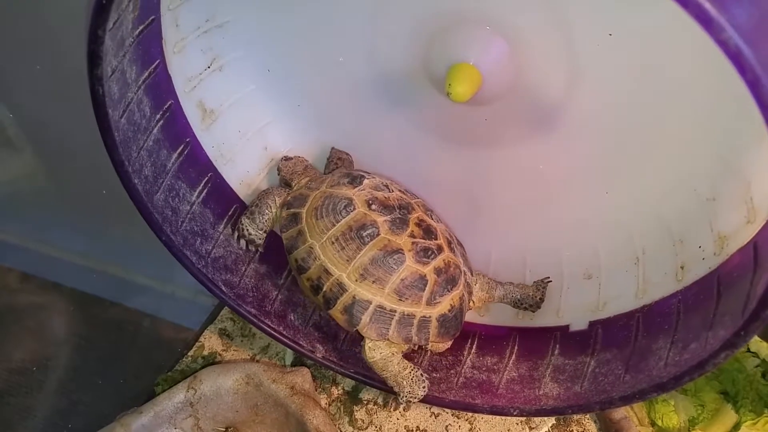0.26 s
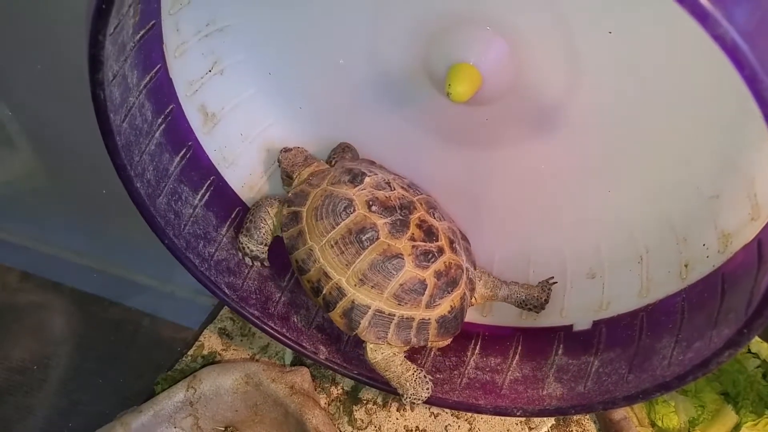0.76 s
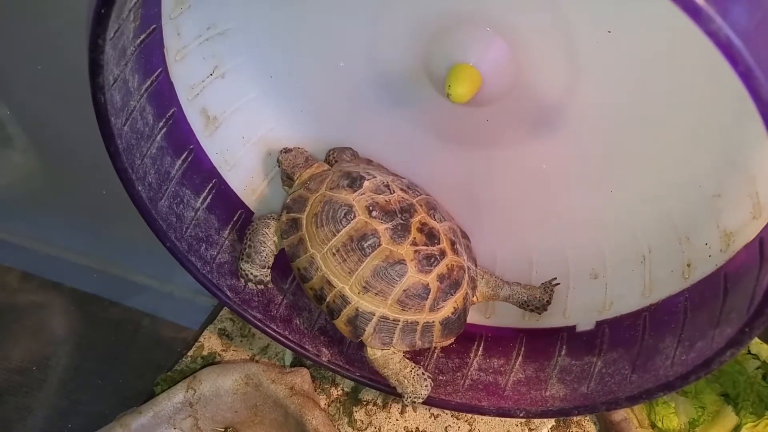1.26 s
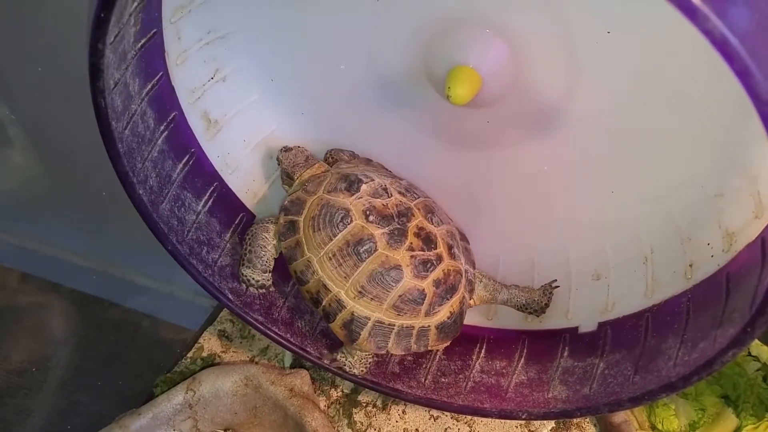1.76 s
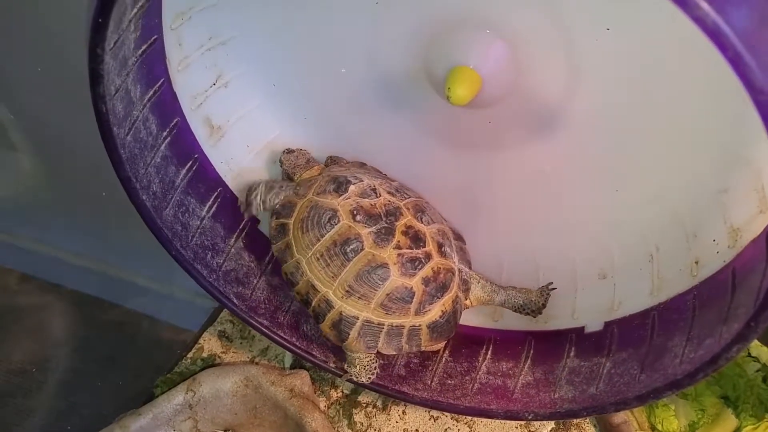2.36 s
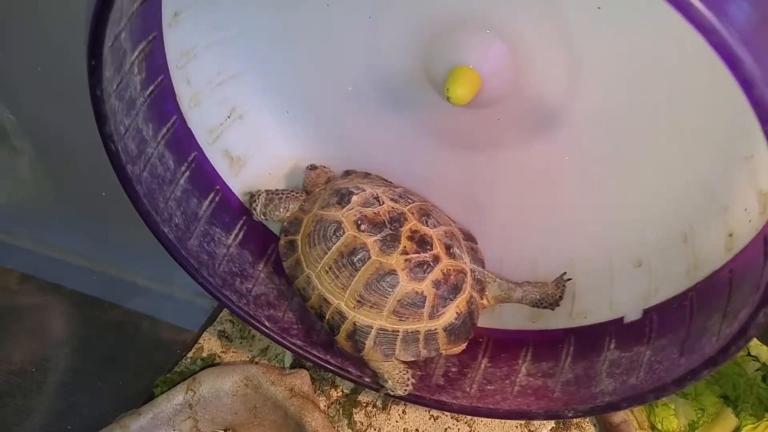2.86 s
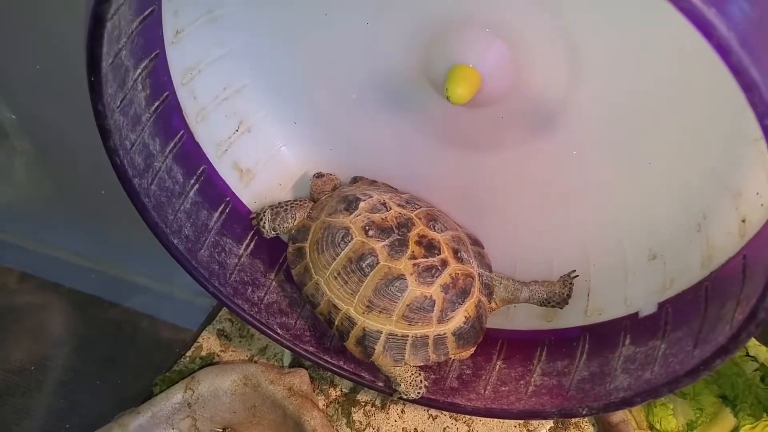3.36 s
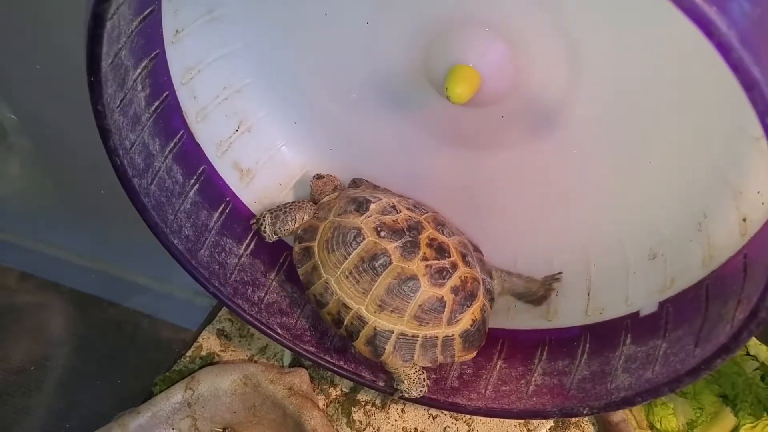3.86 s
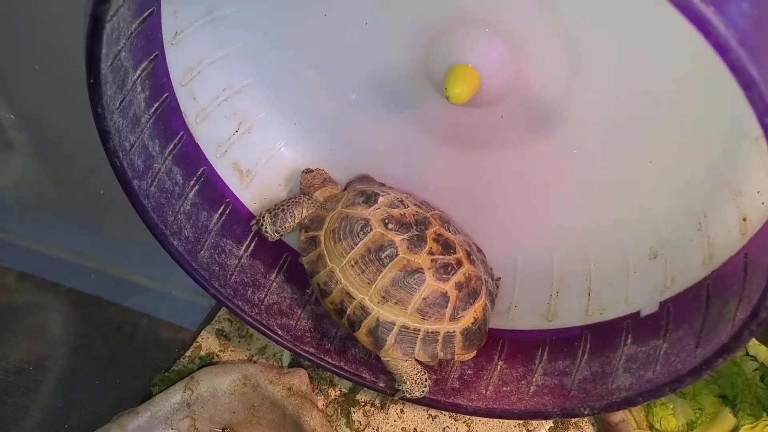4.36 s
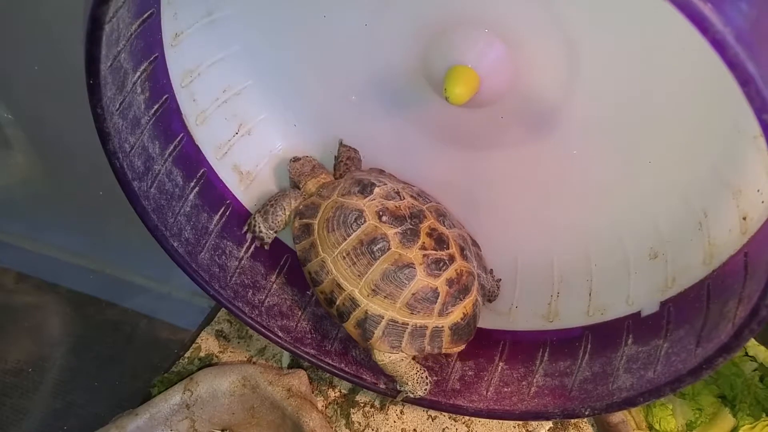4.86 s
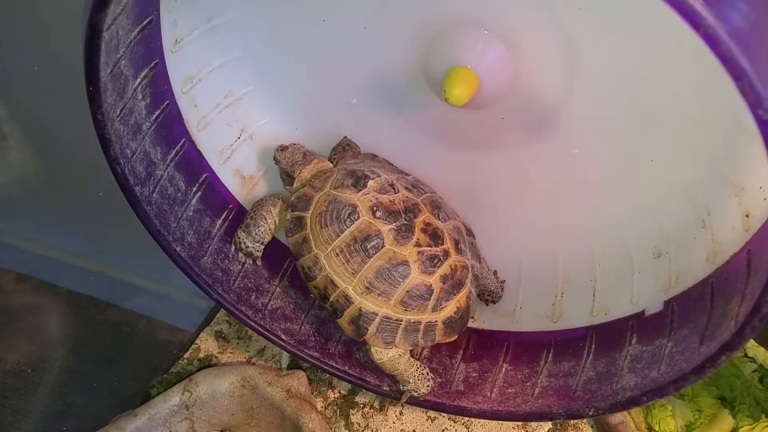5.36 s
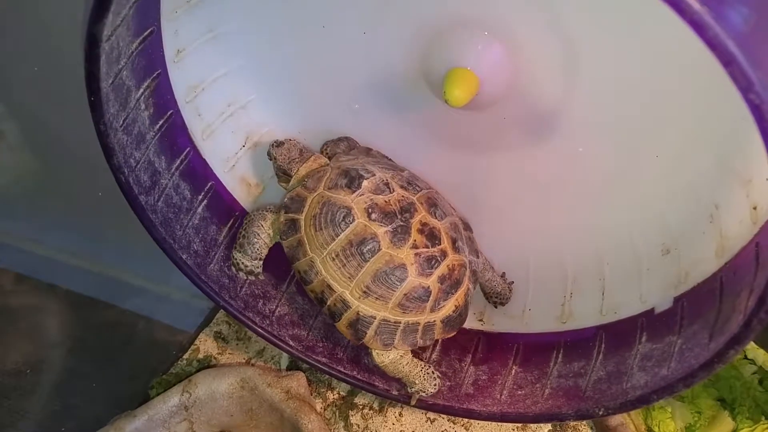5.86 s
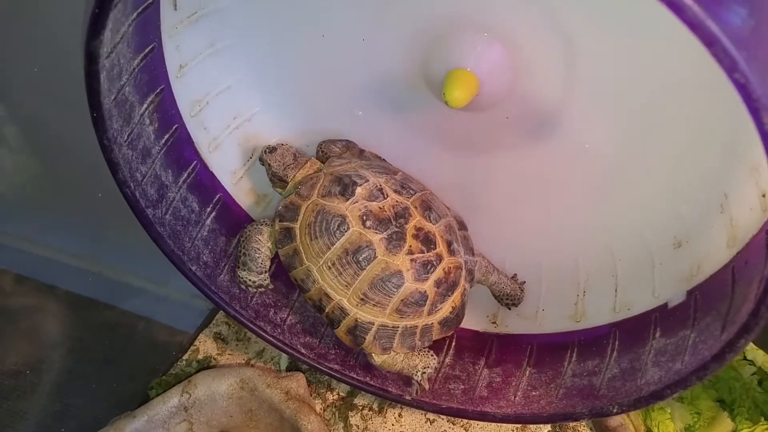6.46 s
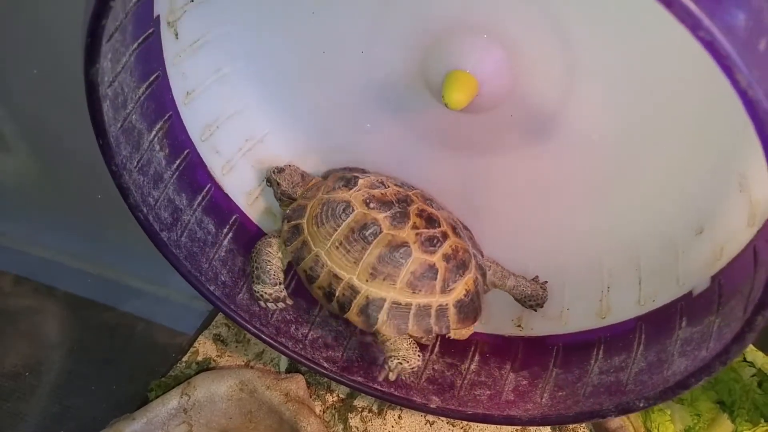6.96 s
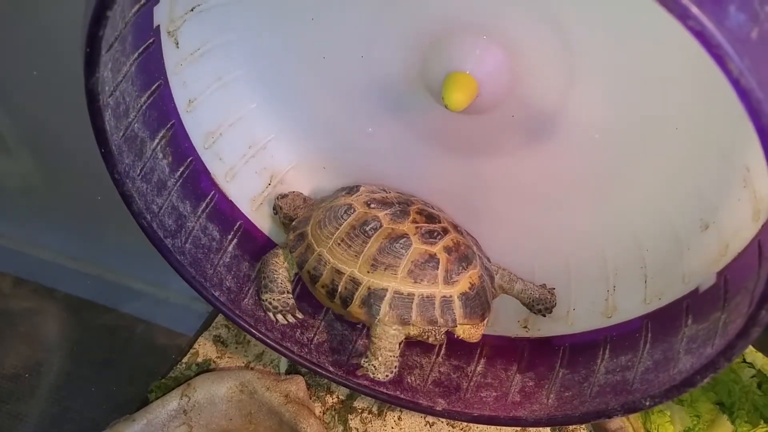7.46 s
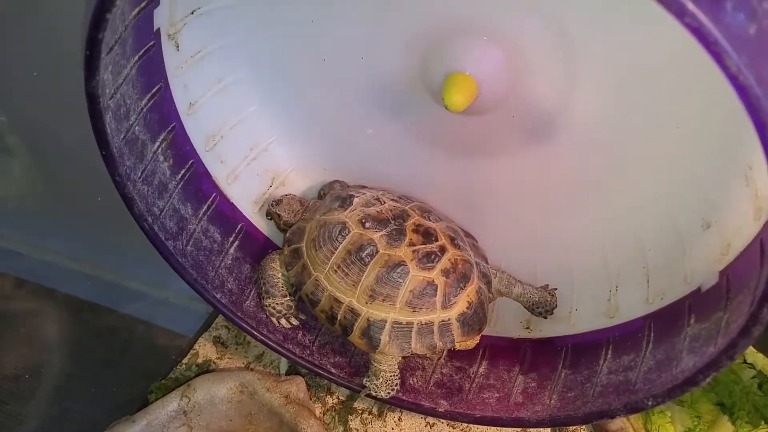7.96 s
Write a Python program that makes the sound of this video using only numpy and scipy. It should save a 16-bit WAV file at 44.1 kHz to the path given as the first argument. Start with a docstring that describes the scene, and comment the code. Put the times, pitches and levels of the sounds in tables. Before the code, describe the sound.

A tortoise walks in a plastic exercise wheel, heard close up. Its claws click sharply and its shell knocks on the ribbed plastic, with a gritty hiss of dragging feet in between. The uneven taps thin out, then a longer scrape leads into the loudest cluster of hollow knocks. Lighter ticks and scratches follow. A faint room hum lies behind it all.

```python
"""Sharp claw knocks come first, over a gritty hiss: a tortoise is walking in a plastic exercise wheel.
Claws and shell strike the ribbed rim and ring the wheel's modes; dragging feet make the hiss.
A microphone pair stands close by, the right one nearer the wheel, with enclosure walls just around it.
Far behind lie the faint hum and hiss of the room."""
import sys
import numpy as np
from scipy import signal
from scipy.fft import rfft, irfft
from scipy.io import wavfile
from scipy.ndimage import uniform_filter1d

SR = 44100
rng = np.random.default_rng(int(sys.argv[2]) if len(sys.argv) > 2 else 0)


def master_out(mix):
    """Clip the mix to full scale and print it as 16-bit PCM to the path in sys.argv[1]."""
    frames = np.transpose(np.atleast_2d(mix))
    ceiling = np.clip(frames, -1, 1)
    pcm = np.round(ceiling * 32767).astype(np.int16)
    wavfile.write(sys.argv[1], SR, pcm)


N = 362502

# blows on the wheel: (time [s], claw crack [dB], shell thump [dB], disc tock [dB], chatter t60 [s])
KNOCKS = [(0.0412, -10, -29.5, -14.5, 0.023), (0.1021, -43, -43.5, -39, 0.017),
          (0.2489, -23, -39, -18, 0.04), (0.3086, -23.5, -26.5, -42, 0.045),
          (0.3323, -21, -33.5, -22.5, 0.067), (0.3836, -36, -47, -44, 0.036),
          (0.4627, -29.5, -36, -32, 0.063), (0.492, -24, -40, -25.5, 0.034),
          (0.6663, -38, -43.5, -36.5, 0.03), (0.692, -26, -29, -28, 0.06), (0.7111, -24, -34.5, -30, 0.07),
          (0.7314, -21, -35, -30, 0.049), (0.7892, -21, -41.5, -22.5, 0.079),
          (0.892, -31.5, -38, -36, 0.042), (0.9138, -26, -42, -26.5, 0.092),
          (0.9409, -17, -27.5, -19.5, 0.06), (0.9848, -19.5, -32, -30, 0.13), (1.0112, -22, -33, -27, 0.1),
          (1.0273, -22, -39, -32.5, 0.027), (1.2438, -29.5, -35, -25, 0.054),
          (1.2818, -45, -64, -34, 0.067), (1.3887, -28.5, -36.5, -25.5, 0.092),
          (1.4511, -17.5, -33.5, -25, 0.039), (1.488, -19, -40, -22, 0.042), (1.65, -29, -38.5, -26.5, 0.1),
          (1.7528, -23.5, -46, -41, 0.026), (1.8022, -27, -49, -25, 0.063),
          (1.8598, -30.5, -40, -49, 0.036), (1.926, -45, -44.5, -34, 0.017),
          (1.9876, -32.5, -59, -52, 0.042), (2.0508, -40, -46.5, -35, 0.04),
          (2.2267, -30.5, -67, -72, 0.13), (2.566, -14.5, -51, -61, 0.055), (2.7136, -35.5, -49, -60, 0.11),
          (2.778, -32.5, -45, -51, 0.042), (2.9243, -38, -45.5, -49, 0.077), (2.9537, -34, -54, -51, 0.12),
          (3.116, -41, -56, -57, 0.025), (3.1388, -29.5, -42.5, -50, 0.05), (3.237, -36, -29, -21, 0.042),
          (3.4857, -52, -52, -52, 0.014), (3.6592, -53, -53.5, -50, 0.05),
          (3.882, -13.5, -38, -15.5, 0.048), (3.929, -24.5, -64, -47, 0.042),
          (3.9743, -22.5, -71, -70, 0.038), (4.0656, -56, -67.5, -38, 0.13),
          (4.0981, -19.5, -46, -22.5, 0.091), (4.1208, -27, -61, -38, 0.042),
          (4.7192, -12, -32.5, -16, 0.054), (4.8526, -8.5, -19.5, -27, 0.089),
          (4.8683, -14, -21.5, -29.5, 0.097), (4.8861, -14, -24, -33, 0.042),
          (4.9318, -22.5, -19.5, -26, 0.052), (4.9641, -15, -21, -16, 0.071),
          (5.0167, -23, -23, -20.5, 0.051), (5.0337, -27, -23, -31, 0.074),
          (5.0685, -27.5, -25.5, -32, 0.056), (5.1011, -21, -36, -20.5, 0.043),
          (5.1797, -30, -30.5, -28.5, 0.081), (5.189, -26, -47, -47, 0.042),
          (5.2285, -29.5, -32.5, -33, 0.064), (5.2848, -43, -44.5, -46, 0.061),
          (5.3226, -40, -34, -37, 0.039), (5.3388, -30, -34, -39, 0.097), (5.438, -38, -48, -46, 0.014),
          (5.4617, -25.5, -28.5, -36, 0.079), (5.5359, -32, -40.5, -30, 0.042),
          (5.5609, -21, -35.5, -20.5, 0.047), (5.5873, -26.5, -55, -19, 0.069),
          (5.6699, -26.5, -36, -30.5, 0.053), (5.7682, -30.5, -34.5, -30, 0.09),
          (5.8115, -26.5, -35, -36, 0.022), (5.8947, -39.5, -42, -41.5, 0.029),
          (5.9954, -36.5, -44, -41, 0.021), (6.1046, -40.5, -54, -47, 0.036),
          (6.128, -38.5, -53, -33.5, 0.13), (6.1637, -28.5, -52, -27, 0.039),
          (6.2208, -52, -56, -41.5, 0.038), (6.274, -44, -47, -52, 0.045), (6.5779, -37, -74, -33, 0.058),
          (6.7448, -47, -63, -43.5, 0.05), (6.8083, -28, -51, -43.5, 0.045), (6.8423, -30, -68, -37, 0.033),
          (6.8787, -31.5, -47, -42, 0.063), (6.9231, -40, -69, -31, 0.071), (6.96, -42, -69, -29.5, 0.045),
          (7.0199, -50, -62, -37, 0.033), (7.0566, -37, -62, -36.5, 0.093), (7.1091, -32, -50, -45, 0.078),
          (7.4326, -22, -35.5, -19, 0.043), (7.541, -33, -51, -31.5, 0.073), (7.628, -22, -47, -48, 0.092),
          (7.643, -40, -36, -33, 0.027), (7.7057, -51, -49, -54, 0.035), (7.9918, -44, -42, -28, 0.083),
          (8.0251, -47, -42, -29.5, 0.014)]
# slides of a foot or the shell; swell and fade each span 20 dB:
# (time of full pressure [s], swell [s], hold [s], fade [s], hiss [dB], low ring over hiss [dB])
SLIDES = [(0.045, 0.045, 0.11, 0.11, -41, -7.5), (0.26, 0.19, .01, 0.06, -45, 0),
          (0.334, 0.025, 0.0078, 0.13, -52, 9.5), (0.496, 0.09, .01, 0.095, -53.5, 5.5),
          (0.693, 0.017, 0.0076, 0.14, -47, 12.5), (0.895, 0.012, 0.089, 0.11, -41.5, 8),
          (1.165, .03, 0.045, 0.047, -56.5, 11.5), (1.5, 0.18, .01, 0.15, -48.5, 1),
          (1.785, 0.053, 0.017, .05, -48, 3), (1.87, .08, .01, 0.18, -49.5, 3.5),
          (1.998, 0.035, .23, 0.089, -50.5, -2.5), (2.349, 0.081, 0.0082, 0.26, -54, 4.5),
          (2.574, 0.088, 0.02, 0.076, -43, 1.5), (2.732, 0.029, 0.012, 0.11, -51.5, 2),
          (2.956, 0.12, .01, 0.14, -65, -12), (3.133, 0.018, .01, 0.14, -52, 0.5),
          (3.861, 0.018, 0.018, .02, -48, 4.5), (3.893, .01, 0.0071, 0.48, -39.5, -7),
          (4.094, 0.0071, 0.0072, 0.24, -35, -9), (4.4, 0.12, 0.14, 0.18, -40, -10.5),
          (4.725, 0.0095, 0.0033, 0.096, -44, 5), (4.865, .02, .01, 0.36, -43.5, 11.5),
          (5.029, 0.018, .01, 0.018, -35, -2), (5.065, .02, .13, 0.28, -55.5, 10),
          (5.322, 0.106, 0.0067, 0.074, -51.5, 12), (5.47, 0.016, 0.0068, 0.022, -36.5, 9.5),
          (5.505, .02, 0.22, 0.21, -60, 13.5), (5.814, 0.068, .01, 0.1, -58, 12),
          (6.149, 0.036, .01, 0.057, -47.5, -7), (6.572, 0.25, .01, 0.15, -60, -6),
          (6.81, 0.1, .01, 0.23, -52, 1), (7.04, 0.085, 0.047, 0.17, -47.5, 2),
          (7.17, 0.097, 0.018, 0.18, -48.5, 0), (7.37, 0.44, 0.026, 0.03, -48.5, 4),
          (7.63, 0.31, .01, 0.064, -45.5, 6), (7.708, .03, 0.092, 0.026, -59, 8.5),
          (8.038, 0.035, 0.045, .1, -53, 18), (8.132, 0.14, 0.015, 0.048, -44, 2)]
# five families of wheel modes, low to high: (frequency [Hz], level [dB], t60 [s], left minus right [dB])
BOWL = [(254.2, 4.5, 0.047, 3), (302, -16, 0.21, 3.5), (357.2, -5, 0.14, 8), (381, 7.5, 0.07, -13),
        (357, 4, 0.018, 40)]
RIM = [(467.6, -3, 0.11, 1.2), (495, 3.5, 0.048, 3.2), (555.2, -4.5, 0.082, 2.5), (646.3, -19.5, 0.29, 1.3),
       (708, 5.5, 0.018, 18)]
DISC = [(791, -1, 0.047, 5), (833.8, 2.5, 0.077, 6), (855.1, -9, 0.18, -1.5), (898, -8, 0.044, 7)]
RIBS = [(1073, 11, 0.023, -3), (1235, 7, 0.04, 9.5), (1383, -13, 0.11, 2), (1615, -7, 0.15, 10),
        (1720, -16, 0.054, -35), (1798, 16.5, 0.008, 23), (1970, -0.5, 0.029, 11),
        (2031.6, -3, 0.042, -22.5), (2100, -41, 0.013, 28.5), (2363, 2.5, 0.032, -10),
        (2664, -14, 0.072, 20), (2837, -20.5, 0.046, -31), (3295, 11.5, 0.006, -13),
        (3833, -4.5, 0.014, 24), (3890, 13, 0.013, 0.5)]
EDGES = [(4390, -1, .02, 0), (4800, -4, .015, 0), (5750, -2, .015, -2), (6030, -1, .02, -2),
         (6430, -1, .015, -3), (7590, -2, .015, -4), (8260, 0, .02, -4), (8790, -1, .015, -4)]
# the whole wheel: (family of modes, lag at the left microphone [s])
FAMILIES = [(BOWL, .00008), (RIM, .0001), (DISC, .0001), (RIBS, 0.0004045), (EDGES, 0.000273)]
# share of a blow that each family takes: (crack [dB], thump [dB], tock [dB])
FAMILY_SHARES = [(-50, 3.5, -21), (-37, 3.5, -3.5), (-55, -24, 3), (-14, 9, -11.5), (-44, -80, -80)]
# spectra of claw crack, sliding grit and room tone: (frequency [Hz], density [dB])
CRACK_SPECTRUM = [(1350, -10), (2300, -8.5), (2980, 3.5), (3650, -1), (5140, -4), (5850, -0.5), (7640, 0.5),
                  (8560, 1.5), (11400, -13.5), (15000, -23.5), (16000, -19)]
GRIT_SPECTRUM = [(1350, -67), (2300, -21), (2450, 2.5), (2860, -8.5), (3290, -5.5), (3750, 0), (4200, -9.5),
                 (4810, -0.5), (5750, -0.5), (7830, -1), (8850, 0.5), (11600, -10.5), (13900, -9.5),
                 (15100, -12), (16000, -46.5)]
ROOM_SPECTRUM = [(15, -52.5), (40, -4.5), (55, -3), (97, -1.5), (170, 0), (195, -25), (223, -7), (301, -18),
                 (373, -12.5), (516, -28), (659, -7.5), (1020, -23), (1560, -26.5), (3160, -32.5),
                 (7300, -38.5), (8800, -24.5), (10500, -38), (16000, -33.5)]
# balance of crack and grit across the pair: (frequency [Hz], left minus right [dB])
TREBLE_PAN = [(2000, 5), (4000, 1), (8000, 0), (15000, -6.5)]
# reflections off the enclosure: (delay to left [s], delay to right [s], level [dB])
WALLS = [(.0009, 0.0014, -17), (.0023, 0.0019, -20), (.0037, .0044, -12), (.0061, 0.0058, -12.5)]
OCTAVES = np.arange(4, 15)  # band centres [log2 Hz]
MICS = np.array([[1], [-1]])  # left, right

LEFT_LAG_S = 0.0003177  # the wheel is nearer the right microphone
RING_SAMPLES = 6144
RIB_HZ, SHARP_RIB_HZ, SHARP_DB = 1950, 3630, 6.5  # rib centre: halfway up at a crack SHARP_DB over the ribs
RIB_RING_DB, RIB_FOLLOWS = -4.5, 0.89  # rib ring over the hiss, and how much it follows the low ring
HISS_FLOOR_DB, ROOM_DB = -69.5, -49.5  # faint steady background hiss between slides; room tone


def knocks():
    """Close up, each blow is a short chatter of claw contacts that cracks and rings the wheel's modes."""
    times, *parts_db, t60 = np.transpose(KNOCKS)
    crack_db = parts_db[0]
    family_db = 10 * np.log10(undb(2 * np.array(FAMILY_SHARES)) @ undb(2 * np.array(parts_db)))
    rib_hz = RIB_HZ + (SHARP_RIB_HZ - RIB_HZ) / (1 + undb(2 * (SHARP_DB + family_db[3] - crack_db)))
    t = np.arange(RING_SAMPLES) / SR
    press = (1 - np.exp(-t / 0.00063)) * decay(t, np.clip(t60, .008, .2)[:, None, None])
    chatter = press * rng.standard_normal((len(times), 2, RING_SAMPLES))
    chatter *= undb(2 * rng.exponential(size=(len(times), 1, RING_SAMPLES)))
    blows = set_peak(at_microphones(chatter, CRACK_SPECTRUM, alike=0.14), crack_db)
    # the slow modes feel mostly the hardest moment of the contact, the quick ones all of the chatter
    for (modes, lag), db, focus in zip(FAMILIES, family_db, (1.74, 2.0, 0.64, 0.053, 0.18)):
        # every spot excites the modes differently, and sends them a little more to one side
        common, sided = rng.standard_normal((len(times), 2, len(modes), 1)).transpose(1, 0, 2, 3)
        spot_db = 2.5 * common + 2 * sided * MICS.T
        if modes is RIBS:
            spot_db -= 5.06 * np.abs(np.log2(np.array(RIBS)[:, :1] / rib_hz[:, None, None]))
        body = np.einsum("kme,mef->kef", undb(spot_db), rfft(wheel_ring(modes, lag)), optimize=True)
        contact = rfft(chatter[:, :1] * press ** focus)
        blows += set_peak(irfft(body * contact), db)
    out = np.zeros((2, N + RING_SAMPLES))
    for start, blow in zip((times * SR).astype(int), blows):
        out[:, start:start + RING_SAMPLES] += blow
    return out[:, :N]


def wheel_ring(modes, lag):
    """Each mode's decaying ring at both microphones; it takes a few cycles to spread over the wheel."""
    t = np.maximum(np.arange(RING_SAMPLES) / SR - np.array([[lag], [0]]), 0)
    hz, db, t60, pan_db = np.transpose(modes)[:, :, None, None]
    spread = 1 - np.exp(-t * hz / 2.49)
    return undb(db + MICS * pan_db / 2) * np.sin(2 * np.pi * hz * t) * decay(t, t60) * spread


def drag():
    """Scales and grit slip over the plastic: dense uneven grains that hiss and keep the modes sounding."""
    hiss_db, low_db = slide_pressure()
    rib_db = RIB_RING_DB + RIB_FOLLOWS * low_db
    force = undb(hiss_db + 1.2 * wander(40) + 1.8 * wander(150))
    grains = rng.standard_normal((7, N)) * undb(2.27 * rng.exponential(size=N))
    hiss = at_microphones(grains[:2], GRIT_SPECTRUM, alike=0.27)
    # the colour of the hiss shifts as other scales take the load
    out = force * unit_rms(flicker(hiss, OCTAVES[7:], swell_db=0, own_db=-0.5, rate=73))
    rings_db = (low_db - 6.5, low_db - 11, low_db - 9.5, rib_db, -10)
    for (modes, lag), grain, ring_db in zip(FAMILIES, grains[2:], rings_db):
        body = wheel_ring(modes, lag).sum(0)
        body /= np.sqrt(np.sum(body.mean(0) ** 2))
        friction = grain / grain.std() * force * undb(ring_db)
        out += signal.oaconvolve(body, friction[None], axes=-1)[:, :N]
    return out


def slide_pressure():
    """Level of the hiss, and of the low ring over it [dB]: the strongest slide rules at each moment."""
    t = np.arange(0, N / SR, .002)
    start, swell, hold, fade, db, low_db = np.transpose(SLIDES)[:, :, None]
    each_db = db - 20 * (np.maximum(start - t, 0) / swell + np.maximum(t - start - hold, 0) / fade)
    share = undb(2 * (each_db - each_db.max(0)))
    hiss_db = np.maximum(each_db.max(0), HISS_FLOOR_DB)
    ring_db = (share * low_db).sum(0) / share.sum(0)
    return (np.interp(np.arange(N) / SR, t, curve) for curve in (hiss_db, ring_db))


def enclosure(x):
    """Nearby walls return the treble a few milliseconds late, differently to each microphone."""
    bright = highpass(x, order=2, hz=1200)
    out = x.copy()
    for *delays, db in WALLS:
        for mic, delay in enumerate(delays):
            late = int(delay * SR)
            out[mic, late:] += undb(db) * bright[mic, :N - late]
    return out


def room_tone():
    """Background hum and hiss that waver a little; the bass is nearly the same at both microphones."""
    hz = np.arange(N // 2 + 1) * SR / N
    mid, side = rfft(rng.standard_normal((2, N))) * undb(curve_at(hz, ROOM_SPECTRUM))
    width = np.clip(hz / 1170, .15, 1)
    steady = irfft(mid + width * side * MICS, N)
    wavering = flicker(steady, OCTAVES, swell_db=0.37 * wander(0.35), own_db=3, rate=7.6)
    return unit_rms(wavering) * undb(ROOM_DB)


def at_microphones(x, spectrum, alike):
    """Colours two noise rows, one shared and one opposed, and places them across the pair."""
    hz = np.arange(x.shape[-1] // 2 + 1) * SR / x.shape[-1]
    shared, opposed = rfft(x[..., :1, :]), rfft(x[..., 1:, :])
    pair = np.sqrt(1 + alike) * shared + np.sqrt(1 - alike) * opposed * MICS
    lag = np.exp(-1j * np.pi * hz * LEFT_LAG_S * MICS)
    gain = undb(curve_at(hz, spectrum) + MICS * curve_at(hz, TREBLE_PAN) / 2)
    return irfft(pair * lag * gain, x.shape[-1])


def flicker(x, octaves, swell_db, own_db, rate):
    """Splits x into octave bands whose levels swell together and wander alone."""
    hz = np.arange(N // 2 + 1) * SR / N
    octave = np.clip(np.log2(hz + 1), octaves[0], octaves[-1])
    spectrum = rfft(x)
    bands = (irfft(spectrum * np.clip(1 - np.abs(octave - k), 0, 1), N) for k in octaves)
    return sum(undb(swell_db + own_db * wander(rate)) * band for band in bands)


def wander(rate):
    """Random levels held 1 / rate seconds and smoothed twice; spread near 1."""
    hold = int(SR / rate)
    steps = np.repeat(rng.standard_normal(N // hold + 1), hold)
    return 1.3 * uniform_filter1d(uniform_filter1d(steps, hold), hold)[:N]


def undb(db):
    return 10 ** (np.asarray(db) / 20)


def decay(t, t60):
    return np.exp(-np.log(1000) * t / t60)


def curve_at(hz, table):
    points_hz, db = np.transpose(table)
    return np.interp(np.log(hz + 1), np.log(points_hz + 1), db)


def set_peak(x, db):
    return x * (undb(db) / np.abs(x.mean(1)).max(-1))[:, None, None]


def unit_rms(x):
    return x / np.sqrt(np.mean(x.mean(0) ** 2))


def highpass(x, order, hz):
    return signal.sosfilt(signal.butter(order, hz, "high", fs=SR, output="sos"), x)


def scene():
    """The wheel up close in its enclosure, the room behind."""
    wheel = highpass(knocks() + drag(), order=4, hz=235)  # too small to radiate deep bass
    return enclosure(wheel) + room_tone()


def record(dry):
    """The microphones lose the deepest bass and the recorder cuts the top."""
    thin = highpass(dry, order=4, hz=45)
    return signal.sosfilt(signal.ellip(12, .2, 90, 16100, fs=SR, output="sos"), thin)


dry = scene()
out = record(dry)
master_out(out)
```